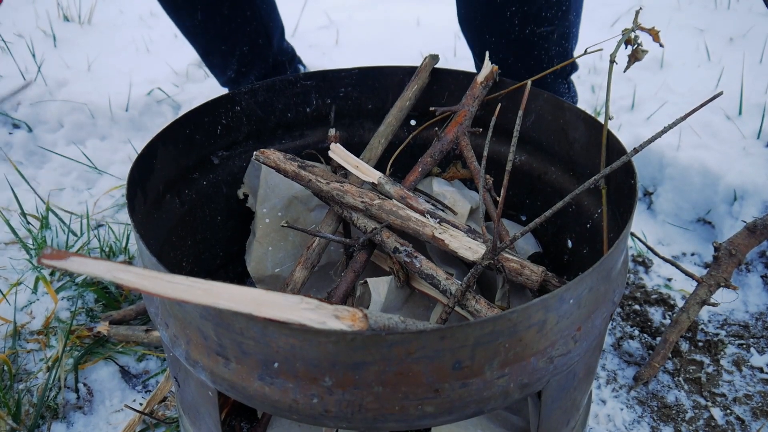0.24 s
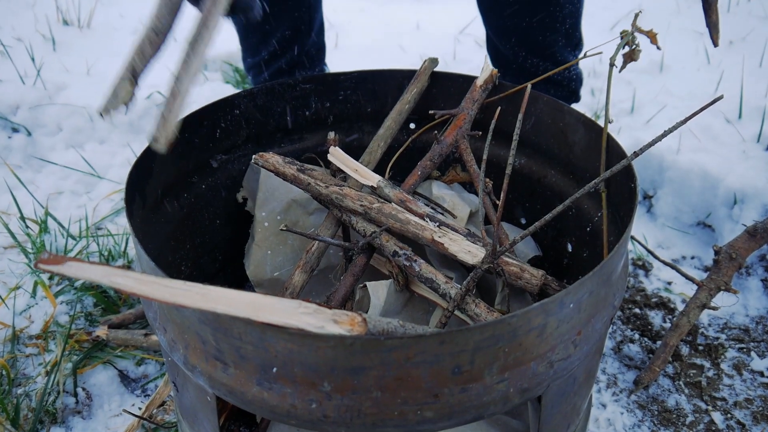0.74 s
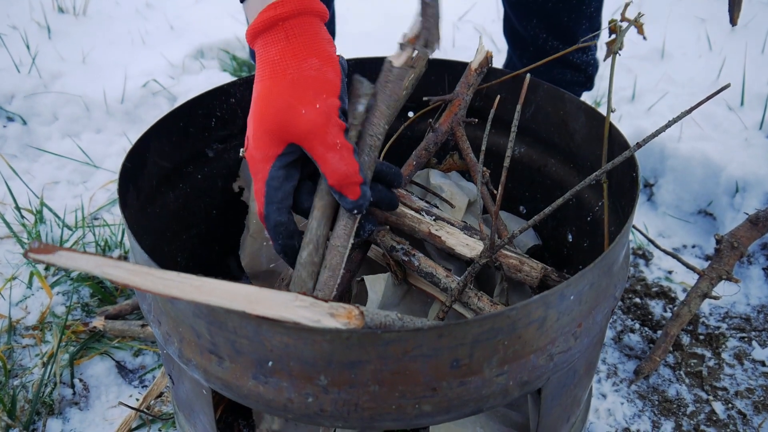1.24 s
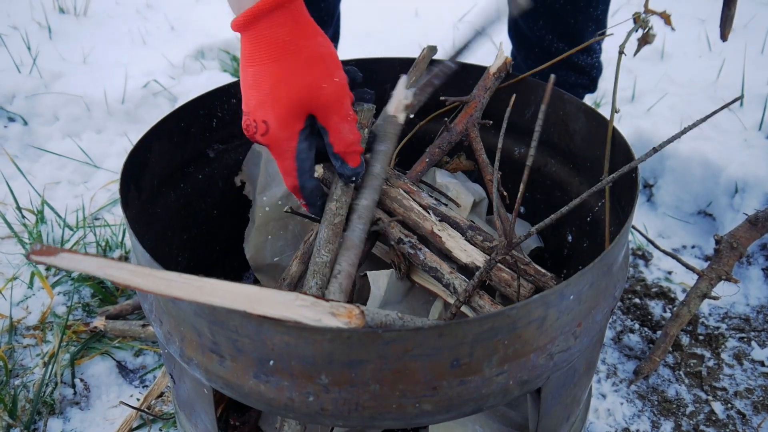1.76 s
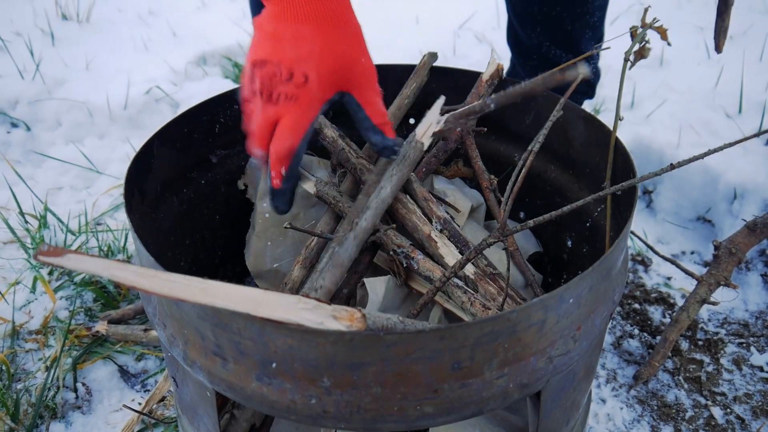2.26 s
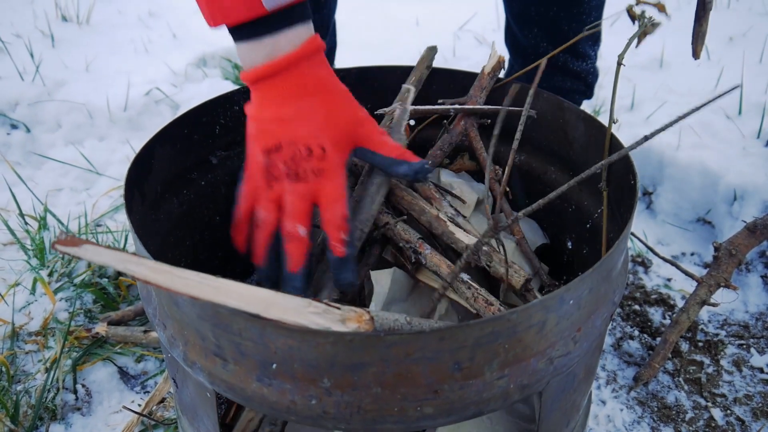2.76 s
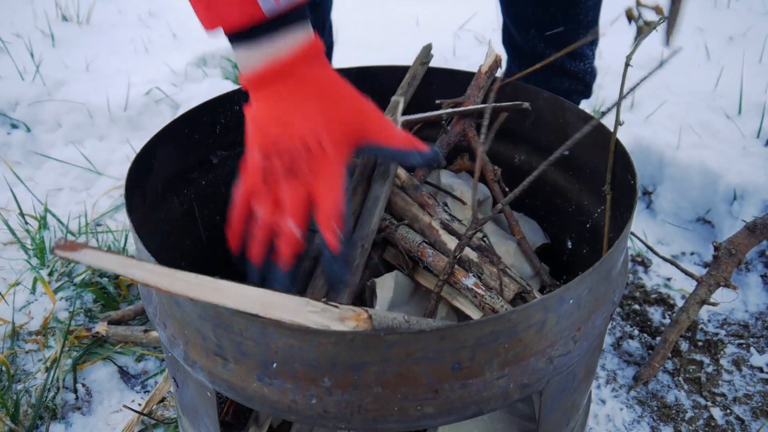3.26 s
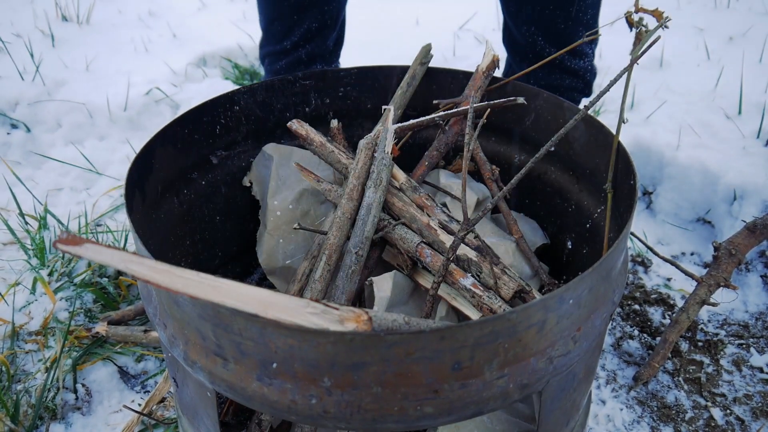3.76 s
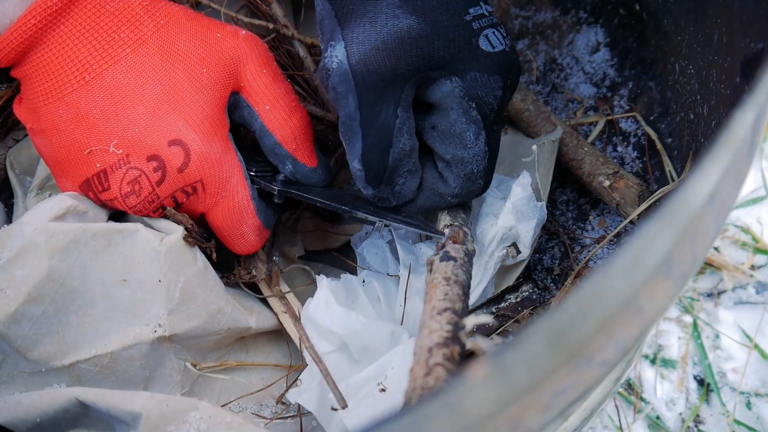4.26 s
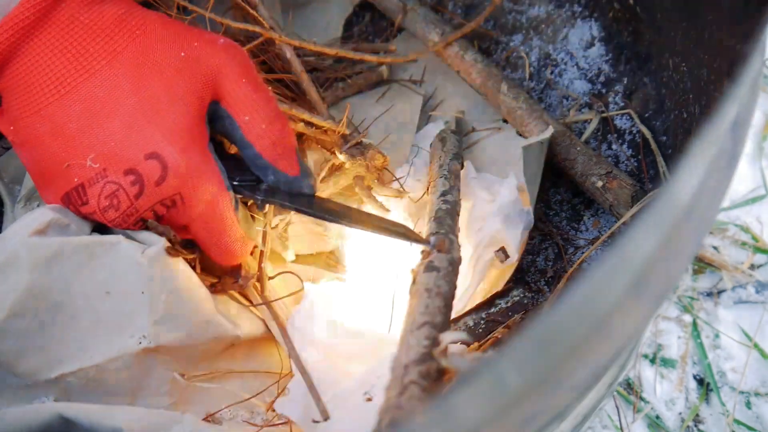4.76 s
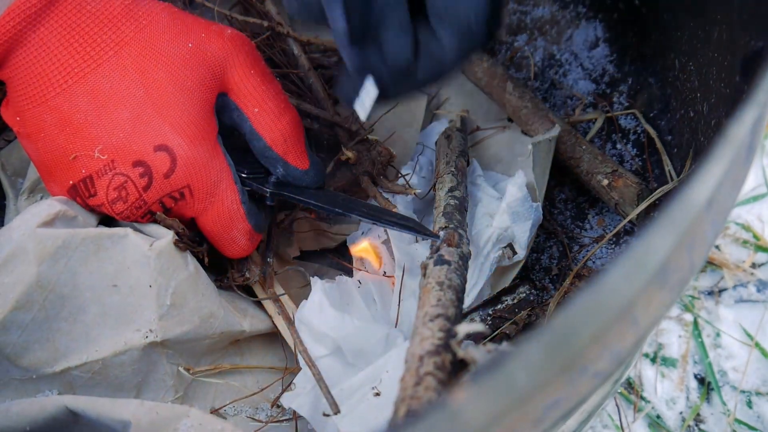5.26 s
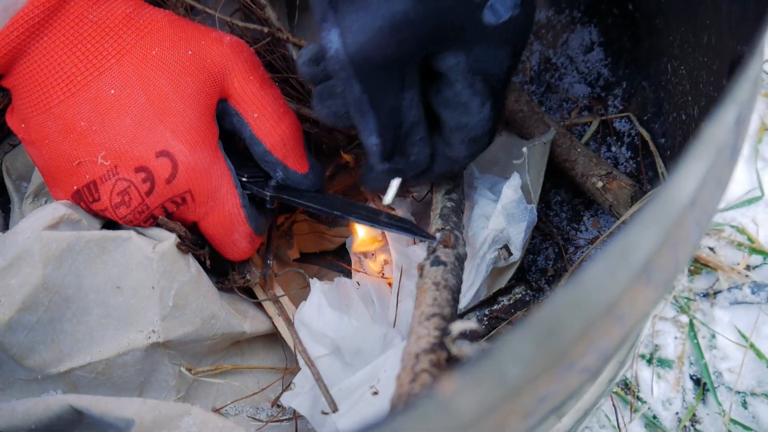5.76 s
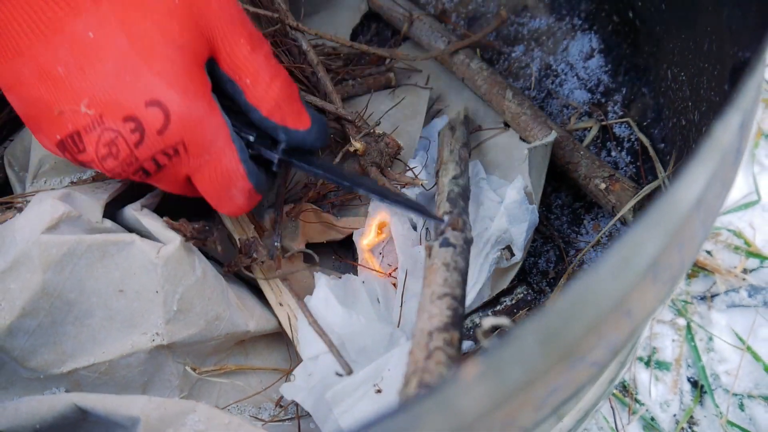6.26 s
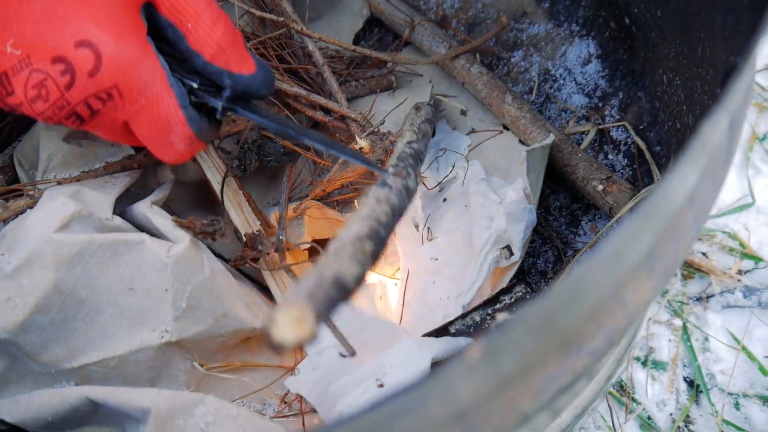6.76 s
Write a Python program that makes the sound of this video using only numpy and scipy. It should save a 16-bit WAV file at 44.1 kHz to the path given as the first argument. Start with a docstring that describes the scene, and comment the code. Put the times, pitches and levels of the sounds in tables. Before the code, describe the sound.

Bark rubs and wood clacks against a ringing metal drum outdoors; after a lull, bright metallic fire-striker rasps, small crackles, rumbling gust and paper rustle.

```python
"""First a short puff of wind and a soft rustle: gloved hands bring dry sticks and push them into a steel
barrel. Bark scrapes (many tiny noise grains), sticks knock and snap (fading tones and noise bursts), and the
barrel rings (many fading tones). Then a knife scrapes a fire steel over crumpled paper, with a few crackles;
a gust (rumbling noise) brushes the microphone and the kindling is rustled. Outdoors, close, no echo."""
import sys
import numpy as np
from scipy import signal
from scipy.fft import rfft, irfft, next_fast_len
from scipy.io import wavfile
from scipy.ndimage import uniform_filter1d

SR = 44100
rng = np.random.default_rng(int(sys.argv[2]) if len(sys.argv) > 2 else 0)


def digitize_waveform(pressure):
    """Quantize a signal to 16-bit integers and store it at the path in sys.argv[1].

    Rows of a 2-D input are taken as channels; values are limited to [-1, 1].
    """
    field = np.atleast_2d(pressure).T
    bounded = np.clip(field, -1, 1)
    quanta = np.round(bounded * 32767).astype(np.int16)
    wavfile.write(sys.argv[1], SR, quanta)


N = 309141
TIME = np.arange(N) / SR  # seconds

# In all tables and settings, t60 is the time a sound takes to fade by 60 dB.
# Wind rumble: (frequency [Hz], relative level [dB])
RUMBLE_SPECTRUM = [(3, -20), (10, -4.5), (25, -13), (55, -18), (90, -32.5), (200, -37), (600, -69)]
# Steady outdoor hiss: (frequency [Hz], relative level [dB])
AIR_SPECTRUM = [(47, -19), (80, -8.5), (174, -18), (413, -17), (482, -15.5), (2380, -22), (6030, -25),
                (9400, -26.5), (16000, -34)]
# Gusts on the microphone: (start [s], attack [s], hold [s], release t60 [s], level [dB])
GUST_TABLE = [(0.0, 0.0055, .02, .4, -38), (5.523, .12, 0.045, 0.51, -25.5), (5.72, 0.088, 0.32, 0.83, -38)]
# How much of the sound differs between the ears: (frequency [Hz], share [dB])
EAR_DIFFERENCE = [(60, -22), (200, -20), (2000, -21), (6000, -20), (12000, -20)]
# Strokes of the knife on the fire steel:
# (time [s], length [s], rasp [dB], blade ring [dB], squeal [dB], brightness [dB per octave])
STROKE_TABLE = [(3.980, 0.022, -41, -36.5, -60, -1.5), (3.991, 0.0047, -33, -31, -42, -.5),
                (4.281, 0.02, -50, -42, -75, -3), (4.378, 0.011, -41, -42, -75, -5),
                (4.425, 0.0044, -36.5, -35.5, -65, -3.5), (4.451, .004, -39, -35.5, -60, -1.5),
                (4.4979, 0.0032, -14, -19, -22, -2.5), (4.5992, 0.005, -13.5, -18.5, -28, -3),
                (4.6275, 0.0043, -12, -34, -20, 1.5), (4.632, 0.025, -18, -15, -37, -1.5),
                (4.652, 0.0027, -11.5, -37, -33, 0.5)]
# Tones of the knife blade pressed on the rod: (frequency [Hz], level before brightness [dB], t60 [s])
BLADE_MODES = [(125, -18, 0.068), (208, -15, 0.11), (320, -4, 0.063), (937, 8.5, 0.097), (1030, 3, 0.11),
               (1143, 3, 0.1), (1788, 3.5, 0.093), (2053, -2.5, 0.12), (2880, -5.5, 0.16),
               (3065, 7.5, 0.038), (3950, 2, 0.094), (7450, -27, 0.035), (8700, -3, 0.025)]
# Tone colour of the rasping steel, also used for barrel hits: (frequency [Hz], relative level [dB])
RASP_SPECTRUM = [(100, -22.5), (300, -7), (650, -9), (1000, -9), (1800, -7), (2600, -11), (3800, -8),
                 (6000, -12.5), (8000, -5), (10500, -16.5), (13000, -14.5), (14500, -33), (16000, -28)]
# Bark squeaking as it slides: (time [s], length [s], start pitch [Hz], end pitch [Hz], level [dB])
SQUEAK_TABLE = [(1.13, 0.024, 1170, 1130, -36.5), (1.205, 0.019, 630, 620, -37.5),
                (2.37, 0.19, 2780, 3770, -45), (2.99, 0.045, 590, 660, -29.5),
                (3.033, 0.029, 646, 680, -24), (6.38, 0.027, 2800, 3420, -44.5),
                (6.397, 0.017, 7600, 7900, -39.5), (6.81, 0.11, 1010, 1210, -35)]
# Tone colour of rubbed bark and paper, also used for snaps: (frequency [Hz], relative level [dB])
RUSTLE_SPECTRUM = [(59, -39), (100, -13.5), (260, -6.5), (335, 0), (424, -6), (570, -3.5), (784, -4.5),
                   (1030, -2.5), (1330, -3), (4200, -9), (6290, -10), (8110, -5), (10500, -15),
                   (14700, -12.5), (16000, -83)]
# Rubs of sticks, paper and gloves: sticks are brought in, pushed into the pile and pressed down by the palm;
# later the hands work in the paper and shift the kindling.
# (start [s], attack [s], hold [s], release t60 [s], base level [dB], brightness [dB], piece's pitch [Hz])
RUB_TABLE = [(0.0, .09, 0.018, 1.8, -55.5, 1, 890), (0.24, 0.068, 0.24, 1.8, -47.5, 2, 670),
             (0.606, 0.24, 0.26, 0.81, -42.5, 3, 1010), (0.858, 0.048, 0.012, 0.19, -39, 10.5, 950),
             (1.195, 0.021, 0.077, 0.42, -42.5, -0.5, 585), (1.395, 0.067, .14, 0.3, -38.5, -0.5, 1370),
             (1.47, 0.027, 0.015, 0.31, -34.5, -7.5, 1450), (1.641, 0.019, 0.05, 0.32, -34, -4, 980),
             (1.784, 0.033, 0.02, 0.42, -37, -1.5, 554), (1.902, 0.024, 0.018, 0.3, -30.5, -0.5, 340),
             (1.964, 0.033, 0.09, 0.25, -32, 0, 1180), (2.103, 0.02, 0.051, 0.97, -33.5, -3, 1460),
             (2.235, .015, .012, .1, -37.5, -10, 575), (2.36, 0.13, 0.059, 0.42, -40.5, 0.5, 720),
             (2.488, 0.056, 0.073, 0.15, -21.5, 1, 870), (2.619, 0.024, 0.17, 0.28, -32.5, -2, 385),
             (2.834, 0.032, 0.0088, 0.11, -20.5, 5.5, 580), (2.886, 0.023, .045, .25, -31, -3, 630),
             (2.994, 0.031, 0.091, 0.87, -37, -4, 704), (3.197, 0.087, 0.014, 0.43, -30, 1, 1300),
             (3.326, .04, 0.14, .15, -41.5, -2.5, 312), (3.502, .1, 0.285, 0.027, -48.5, 4, 920),
             (4.075, 0.026, 0.19, .3, -52.5, 0, 985), (4.65, .01, 0.1, 1.02, -40.5, 1.5, 296),
             (5.068, 0.032, 0.18, 0.87, -49, 3.5, 1320), (5.456, 0.027, 0.2, 0.39, -53.5, -1, 300),
             (5.732, 0.048, 0.053, 0.2, -50, 2.5, 1050), (5.941, .22, 0.0085, 0.56, -34, -1, 1300),
             (6.167, .12, 0.024, 0.14, -32.5, -1.5, 880), (6.346, 0.053, 0.18, 0.34, -44, -0.5, 1340),
             (6.61, 0.026, 0.039, 0.24, -37, 1.5, 1220), (6.69, 0.069, 0.013, 0.13, -36, 0, 1030),
             (6.78, 0.034, 0.089, 0.17, -37, 0, 1030), (6.916, 0.033, 0.029, .3, -44, 0, 1300)]
# Stick knocks and crackles: (time [s], stick pitch [Hz], base level [dB], hardness [dB], base t60 [s])
KNOCK_TABLE = [(0.2636, 1280, -45.5, -4, 0.025), (0.3689, 656, -27, -5.5, 0.019),
               (0.475, 704, -38, -2.5, 0.024), (0.5522, 495, -39, 3.5, .04),
               (1.0853, 735, -40.5, -11.5, 0.03), (1.1248, 707, -37, -5, 0.06),
               (1.1987, 1210, -40, 11.5, .05), (1.4386, 1001, -33.5, 3, 0.03),
               (1.5037, 1450, -31, -6, 0.021), (1.6568, 382, -29, -2, 0.049),
               (1.7724, 445, -35.5, -3, 0.078), (1.921, 343, -26, -1.5, 0.082),
               (2.1945, 624, -28, -5, 0.022), (2.2476, 545, -30, 1, .05),
               (2.3202, 1385, -31.5, -3.5, 0.035), (2.4419, 320, -31, -4.5, 0.081),
               (2.597, 855, -19, -1.5, .082), (2.731, 1020, -24, -1.5, 0.021),
               (2.773, 1120, -23, -3.5, 0.035), (2.915, 1046, -29, -4, 0.085), (3.0031, 610, -29, 0, 0.11),
               (3.0398, 718, -23.5, -2.5, .093), (3.1182, 598, -11, 4.5, 0.02),
               (3.4524, 721, -41, -10, .05), (3.463, 440, -32, -7, 0.061), (3.8148, 419, -42, 7.5, .04),
               (4.445, 979, -26.5, 2, 0.012), (4.7167, 290, -35.5, 8, 0.03),
               (4.8449, 296, -35, -0.5, 0.023), (4.9071, 322, -39.5, 12, 0.013),
               (4.943, 298, -35.5, 3, .039), (5.032, 356, -40, 7, 0.07), (5.1361, 1420, -33.5, -2, 0.021),
               (5.2472, 1320, -35.5, 3.5, 0.0092), (5.309, 1390, -40.5, -1, .015),
               (5.9528, 587, -42, 1.5, .05), (6.3303, 423, -32, 0.5, 0.027), (6.5002, 1190, -37, -5, .023),
               (6.99, 1415, -29.5, -1, .028)]
# Bending tones of a stick: (multiple of its pitch [ratio], relative level [dB], share of base t60 [ratio])
STICK_MODES = [(1, 0, 1), (1.85, -4, .8), (3.4, -13, .6)]
# Sticks hitting the barrel: (time [s], base level [dB], centre of the blow [Hz], spread [octaves],
# chatter t60 [s], ring beside the contact [dB], place from wall to rim [0 to 1])
BLOW_TABLE = [(2.0066, -17, 1690, 1.02, 0.11, 10, 0.11), (2.133, -16.5, 910, 0.99, 0.32, -0.5, 0.25),
              (2.523, -11.5, 900, 1.57, 0.036, -1, 0.78), (2.852, -17, 815, 0.62, 0.092, 6, 0.62),
              (3.118, -15.5, 3920, 0.6, 0.038, -4, 0.91), (3.4865, -8.5, 5200, 2.15, 0.046, -2, 1),
              (3.5175, -17.5, 4930, 1.2, 0.03, 5, 0.89)]
# Tones of the steel barrel: (frequency [Hz], struck on wall [dB], struck on rim [dB], t60 [s])
BARREL_MODES = [(325, -8, -4, .12), (450, -12, -5, .15), (557, -9, -18, .3), (689, -11, -18, .5),
                (1036, -9, -22, .4), (1157, 0, -13, .65), (1444, -5, -22, .6), (1563, -2, -8, .4),
                (1696, -7, -5, .48), (1834, -4, -20, .45), (2009, -5, -18, .3), (2158, 0, -20, .7),
                (2322, -11, -7, .35), (2452, -11, -6, .3), (2699, -6, -4, .25), (2780, -20, -6, .38),
                (2942, -18, -2, .26), (3207, -17, -1, .38), (3435, -20, -4, .18), (3634, -20, -7, .24),
                (3950, -2, -6, .12), (4078, -8, -10, .3), (4294, -12, 6, .23), (4387, -15, 1, .23),
                (4717, -16, -7, .27), (5141, -24, -6, .2), (5690, -28, 4, .16), (6870, -30, 4, .15),
                (7258, -30, -2, .13), (8861, -30, -4, .1)]

AIR_DB = -51.5
BREEZE_DB, BREEZE_SWAY_DB = -45.5, 2  # rumble between gusts, and how far it wanders
MOAN_HZ, MOAN_DB = 253, -38.5  # low note in the strongest gust
MOAN_SHAPE = (5.555, 0.029, 0.086, .45)  # start, attack, hold, release t60, all in s
SQUEAL_HZ, SQUEAL_WIDTH_HZ = 14300, 1100  # the blade's edge as it bites
ATTACK_POWER = 1.12  # an attack grows as this power of time
SCRAPE_DB, GRIT_DB, FIZZ_DB = 1.26, 0.27, -4  # low, middle and high parts of a rub of neutral brightness
JERKS_PER_S, JERK_T60 = 45, 0.067  # a rubbed piece catches and lets go
JERK_DB = 1  # beside the smooth sliding, before each jerk's random strength
CLACK_DB, SNAP_DB = -4.5, -7.5  # beside the thud; hardness weakens the thud and strengthens the snap
TICKS_PER_S, TICK_HZ, TICK_T60 = 14, (320, 1345), .03  # twigs flick loose from the pile
TICK_DB, TICK_SPREAD_DB = -3, 3.5  # beside the rub's grit
TWIN_SPLIT_HZ, TWIN_DB = 7.04, -1  # the barrel is not quite round: each tone beats with a weaker twin
EDGE_HZ = 16000  # top of the final sound


def amp(db):
    """Turns decibels into gain."""
    return 10 ** (np.asarray(db) / 20)


def unit(x, size=None):
    """Scales to an rms of 1, judged on the first size samples."""
    return x / np.sqrt(np.mean(x[:size] ** 2) + 1e-20)


def add(mix, s, sound):
    """Lays a sound into the mix at time s."""
    part = mix[round(s * SR):][:len(sound)]
    part += sound[:len(part)]


def colour(x, spectrum):
    """Makes each frequency louder or softer, following (Hz, dB) points."""
    hz, db = np.transpose(spectrum)
    size = next_fast_len(len(x) + 1024)
    f = np.fft.rfftfreq(size, 1 / SR)
    gain = amp(np.interp(np.log(f + 1), np.log(hz), db))
    return irfft(rfft(x, size) * gain, size)[:len(x)]


def bandpass(x, order, edges):
    """Keeps the frequencies between two edges in Hz."""
    return signal.sosfilt(signal.butter(order, edges, "band", fs=SR, output="sos"), x)


def register(x, index):
    """Keeps the low, middle or high register."""
    return bandpass(x, 4, [(65, 1300), (1300, 5000), (5000, 17000)][index])


def burst(t, t60):
    """Noise that dies away."""
    return rng.standard_normal(len(t)) * amp(-60 * t / t60)


def ring(t, modes):
    """Fading sine tones from rows of (Hz, dB, t60)."""
    return sum(amp(db - 60 * t / t60) * np.sin(2 * np.pi * (hz * t + rng.random()))
               for hz, db, t60 in modes)


def resonate(x, hz, width):
    """Strengthens a narrow band that follows the curve hz: shift it to zero, smooth, shift back."""
    turn = np.exp(2j * np.pi * np.cumsum(hz) / SR)
    r = np.exp(-np.pi * width / SR)
    return (turn * signal.lfilter([1 - r], [1, -r], x / turn)).real


def envelope(start, attack, hold, release):
    """Gain that swells, holds and dies away."""
    t = TIME[::32] - start  # a coarse curve, filled in below
    rise = np.clip(t / attack, 0, 1) ** ATTACK_POWER
    fall = amp(-60 * np.clip((t - attack - hold) / release, 0, 2))
    return np.interp(TIME - start, t, rise * fall)


def smooth_noise(first, second):
    """Slow random drift: noise averaged twice, over the given numbers of samples."""
    return unit(uniform_filter1d(uniform_filter1d(rng.standard_normal(N), first), second))


def outdoors():
    """A swaying breeze with gusts, a soft low note in the strongest, and a faint steady hiss."""
    rumble = unit(colour(rng.standard_normal(N), RUMBLE_SPECTRUM))
    rumble /= np.sqrt(uniform_filter1d(rumble ** 2, 9000) + 0.044)  # even out its own swells
    breeze = amp(BREEZE_DB + BREEZE_SWAY_DB * smooth_noise(6000, 3000))
    gust_power = sum((amp(db) * envelope(*shape)) ** 2 for *shape, db in GUST_TABLE)
    wind = rumble * np.sqrt(breeze ** 2 + gust_power)
    waver = unit(uniform_filter1d(rng.standard_normal(N), 900))
    moan_hz = MOAN_HZ * (1 + 0.0171 * waver)
    moan = np.sin(2 * np.pi * np.cumsum(moan_hz) / SR) * amp(MOAN_DB) * envelope(*MOAN_SHAPE)
    hiss = amp(AIR_DB) * unit(colour(rng.standard_normal(N), AIR_SPECTRUM))
    return wind + moan + hiss


def stroke(length, rasp_db, ring_db, squeal_db, tilt_db):
    """The blade bites with a squeal, tears grains off the rod and rings; a lower tilt dulls rasp and ring."""
    t = np.arange(9000) / SR
    after, size = np.maximum(t - length, 0), int(length * SR) + 20
    bite = (1 - np.exp(-t / 0.00066)) * amp(-60 * after / 0.0044)
    pressure = bite + 0.34 * (1 - np.exp(-t / 0.00058)) * amp(-60 * after / 0.11)
    roughness = unit(uniform_filter1d(rng.standard_normal(len(t)), 30))
    grains = rng.standard_normal(len(t)) * amp(1.3 * roughness)
    tilted = [(hz, db + tilt_db * np.log2(hz)) for hz, db in RASP_SPECTRUM]
    rasp = unit(colour(grains * pressure, tilted), size=size)
    edge_hz = np.full(len(t), SQUEAL_HZ)
    squeal = resonate(grains * bite, edge_hz, SQUEAL_WIDTH_HZ)
    squeal = unit(resonate(squeal, edge_hz, SQUEAL_WIDTH_HZ), size=size)
    modes = [(hz, db + 1.17 * tilt_db * np.log2(hz), t60) for hz, db, t60 in BLADE_MODES]
    blade = ring(t, modes) * (1 - np.exp(-(t / 0.0024) ** 2))
    return amp(rasp_db) * rasp + amp(squeal_db) * squeal + amp(ring_db) * unit(blade, size=400)


def squeak(length, start_hz, end_hz, db):
    """Quick slips, made of noise, keep one gliding resonance of a stick singing."""
    size = int(length * SR)
    glide = np.linspace(start_hz, end_hz, size)
    tone = resonate(rng.standard_normal(size), glide, width=0.066 * start_hz)
    tone = resonate(tone, glide, width=0.43 * start_hz)
    return amp(db) * unit(tone * signal.windows.tukey(size, .5))


def slips(per_s, spread_db, clump_db, t60, low_hz, high_hz, count=24):
    """Tiny stick-slip releases in clumps, each ringing one of many twigs or creases."""
    t, out = np.arange(2048) / SR, np.zeros(N)
    clumps = smooth_noise(400, 200)
    size = amp(spread_db * np.minimum(rng.exponential(1, N), 3.5) + clump_db * clumps)
    clicks = size * (rng.random(N) < per_s / SR) * rng.choice([-1, 1], N)
    twig = rng.integers(0, count, N)
    for k, hz in enumerate(np.geomspace(low_hz, high_hz, count)):
        tone = unit(ring(t, [(hz * rng.uniform(0.884, 1.015), 0, t60)]))
        grain = unit(burst(t, t60 * 0.93)) + 0.43 * tone
        out += signal.oaconvolve(clicks * (twig == k), grain)[:N]
    return colour(out, RUSTLE_SPECTRUM)


def wander(x, depth_db, size):
    """As the contact shifts, narrow resonances come and go."""
    z = signal.stft(x, nperseg=1024, noverlap=768)[2]
    patches = uniform_filter1d(rng.standard_normal(z.shape), size, 0)  # across frequency
    patches = unit(uniform_filter1d(patches, 10, 1))  # across time
    return signal.istft(z * amp(depth_db * patches), nperseg=1024, noverlap=768)[1][:len(x)]


def jerks():
    """Gain of uneven sliding: sudden releases that die away."""
    kicks = (rng.random(N) < JERKS_PER_S / SR) * rng.uniform(0.23, 1.33, N)
    fading = signal.lfilter([1], [1, -amp(-60 / (JERK_T60 * SR))], kicks)
    return unit(1 + amp(JERK_DB) * fading)


def rubbing():
    """Strengths of scrape, grit and fizz over all rubs, and the pitch of the piece that scrapes loudest."""
    power = np.array([envelope(*row[:4]) for row in RUB_TABLE]) ** 2
    db, bright_db, hz = np.transpose(RUB_TABLE)[4:]
    # brightness trades scrape for fizz
    gains = amp([db + SCRAPE_DB - bright_db, db + GRIT_DB, db + FIZZ_DB + bright_db])
    loudest = np.argmax(power.T * gains[0] ** 2, axis=1)
    return np.sqrt(gains ** 2 @ power), hz[loudest]


def rustle(gains, stick_hz):
    """Sticks rub low and sound their own pitch, bark grinds in the middle, paper and gloves fizz on top."""
    coarse = slips(per_s=1600, spread_db=1.5, clump_db=1.4, t60=0.02, low_hz=179.5, high_hz=1280)
    coarse = unit(coarse) + 0.16 * unit(resonate(coarse, stick_hz, width=120))
    fine = slips(per_s=4000, spread_db=0.0, clump_db=0.7, t60=0.0041, low_hz=1470, high_hz=10950)
    fine = wander(fine, depth_db=3.5, size=4)
    uneven = jerks()
    layers = [coarse * uneven, fine * uneven, fine * np.sqrt(uneven)]  # fizz jerks less
    return sum(unit(register(x, index=k)) * gains[k] for k, x in enumerate(layers))


def knock(hz, db, hard_db, t60):
    """A stick's bending tones, the clack of the contact and a snap of fibres."""
    t = np.arange(6000) / SR
    modes = ring(t, [(hz * k, mode_db, t60 * share) for k, mode_db, share in STICK_MODES])
    give = 1 - np.exp(-t / 0.00029)  # bark cushions the blow
    tones = bandpass(give * modes, 2, [330, 1500])
    dull_noise = bandpass(give * burst(t, t60 * 1.9), 2, [330, 1500])
    thud = .9 * unit(tones, size=300) + .45 * unit(dull_noise, size=300)
    splinters = ring(t, [(f, 0, t60 * 1.8) for f in rng.uniform(1514, 4500, 5)])
    clack = register(burst(t, t60 * 0.2) + 0.096 * splinters, index=1)
    fibres = burst(t, t60 * 0.69) + 0.25 * burst(t, t60 * 3.0)
    snap = register(colour(fibres, RUSTLE_SPECTRUM), index=2)
    parts = [(thud, -hard_db), (clack, CLACK_DB), (snap, SNAP_DB + hard_db)]
    return sum(amp(db + part_db) * unit(x, size=300) for x, part_db in parts)


def ticks(grit):
    """Small knocks at random moments, as strong as the rubbing that frees them."""
    out = np.zeros(N)
    for when, pitch, size, hard in rng.random((int(TICKS_PER_S * N / SR), 4)):
        hz = TICK_HZ[0] * (TICK_HZ[1] / TICK_HZ[0]) ** pitch
        tick = knock(hz, TICK_DB + TICK_SPREAD_DB * (2 * size - 1), 6 * (2 * hard - 1), TICK_T60)
        add(out, when * N / SR, grit[int(when * N)] * tick)
    return out


def barrel(db, centre_hz, octaves, chatter, ring_db, rim):
    """A chattering contact wakes the barrel's clear tones and a clang of many weaker, shorter ones."""
    t = np.arange(SR) / SR
    blow = [(hz, max(-4.3 * (np.log2(hz / centre_hz) / octaves) ** 2, -26))
            for hz in np.geomspace(60, 16000, 30)]
    contact = unit(colour(colour(burst(t, chatter), blow), RASP_SPECTRUM), size=300)
    sheet_hz = np.geomspace(300, 14000, 90) * rng.uniform(.98, 1.02, 90)
    # high tones die sooner
    sheet = ring(t[:SR // 2], [(hz, 0, 0.23 / (1 + hz / 7000)) for hz in sheet_hz])
    sheet = np.pad(sheet, (0, len(t) - len(sheet)))
    clang = unit(colour(colour(sheet, blow), RASP_SPECTRUM), size=900)
    struck = [(hz, np.interp(rim, [0, 1], [wall_db, rim_db]), t60)
              for hz, wall_db, rim_db, t60 in BARREL_MODES]
    twins = [(hz + TWIN_SPLIT_HZ * rng.uniform(0.44, 2.04), mode_db + TWIN_DB, t60)
             for hz, mode_db, t60 in struck]
    modes = unit(ring(t, struck + twins), size=900)
    swell = 1 - np.exp(-t / 0.008)
    ringing = swell * (amp(-9.5) * clang + amp(-8.0) * modes)
    return amp(db) * (0.75 * contact + amp(ring_db) * ringing)


def scene():
    """Nearly mono: the rustle differs slightly between the ears, the hits less."""
    hits = np.zeros(N)
    sources = [(KNOCK_TABLE, knock), (BLOW_TABLE, barrel), (STROKE_TABLE, stroke), (SQUEAK_TABLE, squeak)]
    for table, source in sources:
        for s, *row in table:
            add(hits, s, source(*row))
    gains, stick_hz = rubbing()
    pile, air = rustle(gains, stick_hz), outdoors()
    scatter = burst(np.arange(2400) / SR, 0.03)
    scatter /= np.linalg.norm(scatter)
    side = colour(signal.oaconvolve(pile + 0.23 * hits, scatter)[:N], EAR_DIFFERENCE)
    side += 0.037 * air  # the wind is slightly louder on the left
    side += amp(AIR_DB - 18.5) * unit(colour(rng.standard_normal(N), AIR_SPECTRUM))  # hiss that differs by ear
    mid = pile + hits + air + ticks(gains[1])
    return np.array([mid + side, mid - side])


def record(dry):
    """The sharpest peaks overload and are cut flat; then a steep filter takes off the very top."""
    clipped = np.clip(dry, -.95, .95)
    lowpass = signal.firwin(255, EDGE_HZ, window=("kaiser", 9), fs=SR)
    return signal.oaconvolve(clipped, lowpass[None], "same")


dry = scene()
out = record(dry)
digitize_waveform(out)
```